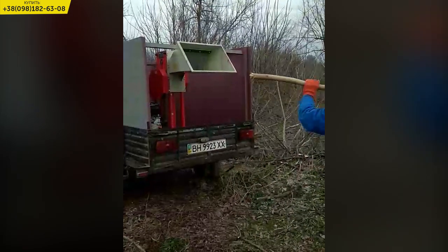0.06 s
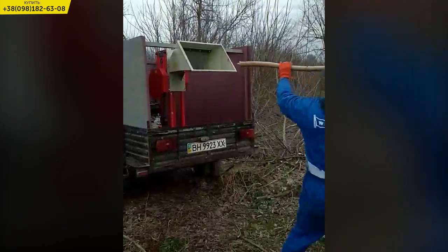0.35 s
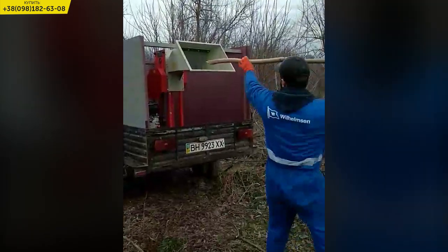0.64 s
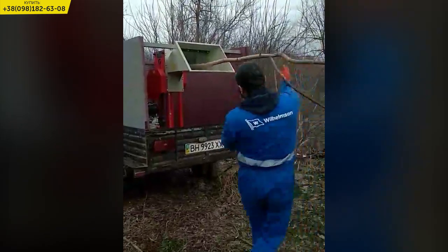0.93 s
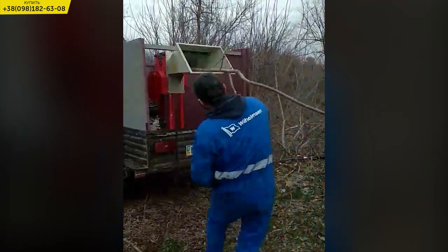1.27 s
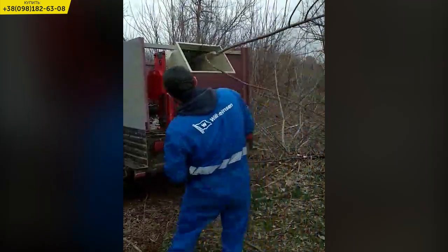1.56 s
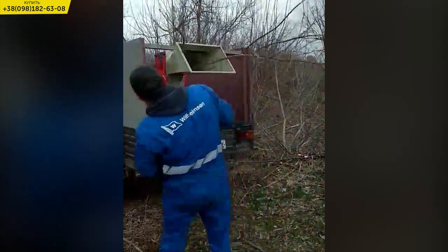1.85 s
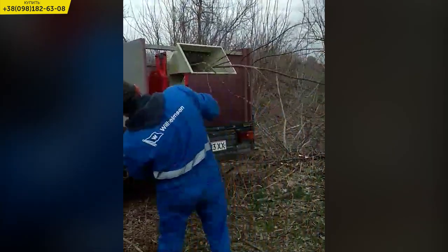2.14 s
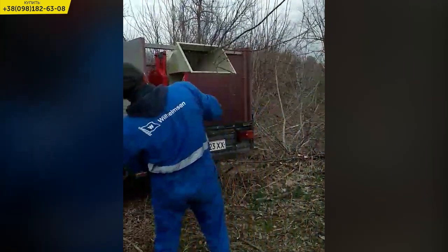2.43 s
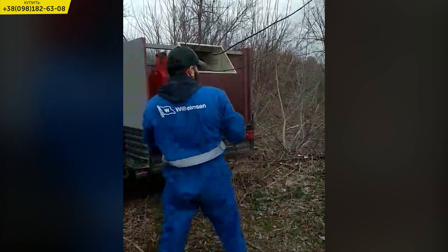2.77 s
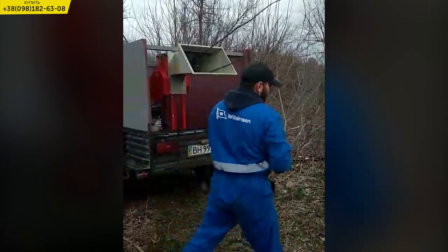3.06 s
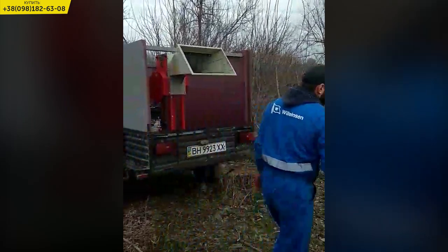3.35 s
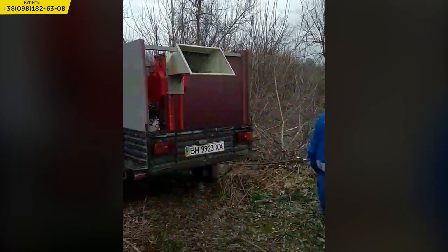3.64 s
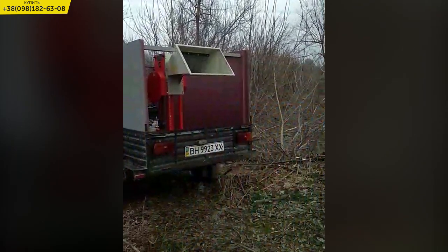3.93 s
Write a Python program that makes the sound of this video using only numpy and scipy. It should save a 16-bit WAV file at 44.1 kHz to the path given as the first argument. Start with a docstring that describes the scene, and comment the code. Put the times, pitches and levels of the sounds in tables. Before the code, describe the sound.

A wood chipper drones loudly outdoors, then rapidly chops up a branch fed into it.

```python
"""An engine-driven wood chipper runs outdoors, a few metres away, its drive squeaking.
After about a second a long branch goes in, and the engine sags as the knives knock rapidly on it.
Chips start to spray out in swishes, about 14 a second; the wood crunches and rasps on the steel.
The knocks ring the steel hopper (the feed funnel), which booms twice on thick wood.
Towards the end the knives bite less hard and the engine picks up speed again."""
import sys
import numpy as np
from scipy import signal
from scipy.fft import rfft, irfft
from scipy.io import wavfile
from scipy.ndimage import uniform_filter1d

SR = 44100
rng = np.random.default_rng(int(sys.argv[2]) if len(sys.argv) > 2 else 0)


def wrap_up_sound(samples):
    """Save the sound to the file named by the first command line argument, as 16-bit audio."""
    columns = np.atleast_2d(samples).T
    # keep every value between -1 and 1, then stretch to whole-number steps
    tamed = np.clip(columns, -1, 1)
    steps = np.round(tamed * 32767).astype(np.int16)
    wavfile.write(sys.argv[1], SR, steps)


N = 176400
T, HZ = np.arange(N) / SR, np.fft.rfftfreq(N, 1 / SR)

# Levels in the tables are relative. A "colour" says how strong a sound is from low to high pitch.
# how hard the knives bite: t/s, level/dB
BITE = [(.8, -49), (1.02, -13.5), (1.17, -20), (1.245, -11), (1.27, -1), (1.32, -1.5), (1.52, 1.5),
        (1.8, 0), (2.07, -1.5), (2.14, 3), (2.22, -1.5), (2.44, 2.5), (2.52, -2.5), (2.57, 2), (2.8, -6),
        (2.92, -3), (3.03, -5), (3.27, -4), (3.4, -1.5), (3.46, -5.5), (3.53, -2), (3.62, -4.5), (4, -7)]
# colour of knives in wood: f/Hz, level/dB
CHOP_COLOUR = [(30, -40.5), (70, 0.5), (110, -2), (200, 4), (300, 2.5), (400, -2), (650, -4.5), (900, -7),
               (1300, -9.5), (1900, -10), (2200, -17.5), (2600, -26.5), (3800, -28.5), (5000, -46.5)]
# pitches at which the steel hopper and housing ring: f/Hz, width/Hz, level/dB
HOUSING_RINGS = [(162.7, 7.7, 3.5), (336.6, 14.4, 7.5), (458, 26, 5), (581.3, 20.6, 8.5), (651, 21.3, 9.5),
                 (764, 6.3, 13), (808, 7.5, 8.5), (1000, 19, 8), (1030.5, 21.7, 10), (1415.5, 24, 11.5),
                 (1487, 14.5, 7), (1987, 60, 2)]
# the hopper's low boom: t/s, level/dB
LOW_BOOM = [(0, -45), (1.25, -32), (1.45, -10), (1.525, 3.5), (1.6, 2), (1.73, -10), (1.8, -4), (1.87, -11),
            (2.19, -6), (2.235, 2.5), (2.35, 1), (2.45, -3.5), (2.75, -19), (3.12, -6), (3.35, -18),
            (3.56, -9), (3.7, -18), (4, -20)]
# its upper boom, which rises as thick wood goes in: t/s, level/dB, f/Hz
HIGH_BOOM = [(1.25, -45, 220), (1.48, -8, 225), (1.53, 3, 235), (1.58, 3.5, 268), (1.74, 2.5, 272),
             (1.81, -3, 238), (1.9, -12, 230), (2.17, -7, 215), (2.26, -1, 240), (2.33, -5, 262),
             (2.45, 3, 235), (2.56, -10, 232), (2.63, 1, 232), (2.76, -12, 235), (3.14, -7, 238),
             (3.5, -22, 235)]
# crunches where the wood splits: t/s, level/dB
CRUNCHES = [(1.258, 0), (1.284, -1), (1.5, -2), (2.125, -6), (2.15, -1), (2.553, 2), (2.58, 0), (3.245, -2),
            (3.32, -1), (3.355, -2)]
# their colour: f/Hz, level/dB
CRUNCH_COLOUR = [(60, -23), (300, -5), (700, -13), (1500, -1), (2000, 0), (2700, -19), (6000, -42)]
# how often the engine fires: t/s, f/Hz
FIRING_RATE = [(0, 56.1), (.3, 56.4), (.8, 56.3), (1.27, 56.7), (1.42, 54.5), (1.6, 52.5), (2.0, 53),
               (2.6, 53.4), (2.85, 54.6), (3.6, 54.6), (3.8, 55.6), (4, 56.4)]
# the deep firing tone: t/s, level/dB
DRONE = [(0, -21.5), (.26, -16.5), (1.28, -17.5), (1.39, -25), (1.52, -37), (1.75, -30), (2.05, -26.5),
         (2.6, -21), (2.8, -19.5), (3.55, -20), (3.72, -17), (4, -16)]
# low steady tones of the engine and turning knife drum: multiple of a quarter firing rate, level/dB
MACHINE_TONES = [(3, -48), (6, -37), (8, -30), (10, -29.5), (11, -31), (12, -31), (16, -30.5), (18, -37.5),
                 (20, -37.5), (22, -37.5), (24, -35.5), (26, -37)]
# buzz and clatter of the running machine: t/s, level/dB
RUNNING = [(0, 4), (.2, 0.5), (.45, 3), (1.05, 1.5), (4, 1)]
# their colour: f/Hz, level/dB
CLATTER_COLOUR = [(20, -27), (45, 4.5), (90, -1), (160, -1.5), (300, -6.5), (450, -9.5), (620, -9.5),
                  (900, -11.5), (1400, -14.5), (2000, -13), (2400, -19.5), (2850, -30.5), (3150, -17.5),
                  (3600, -23), (4450, -21), (5100, -33.5), (16000, -79)]
# the steel's singing note: t/s, level/dB
SINGING = [(0, -2), (.35, -28), (.85, -22), (1.07, 1), (1.28, -7.5), (1.4, 2.5), (1.72, -8.5), (1.92, 7),
           (2.1, -0.5), (2.3, -2), (2.55, -3.5), (2.8, 0.5), (3.1, -2.5), (3.4, -8), (3.52, 5.5),
           (3.7, -14), (4, 2)]
# its low hum: t/s, level/dB
HUM = [(0, 1), (.22, -9.5), (.47, 0), (.9, -10.5), (1.4, -26), (2.3, -4), (2.7, -2.5), (2.95, 7.5),
       (3.15, -6), (3.3, 1), (3.6, -5), (4, -0.5)]
# swishes of chips: t/s, level/dB
SWISHES = [(1.273, 3), (1.338, 2), (1.415, 3), (1.492, 2), (1.565, 0), (1.634, 1), (1.716, 1), (1.785, 2),
           (1.857, 3), (1.926, 2), (1.998, 2), (2.074, 3), (2.14, 2), (2.216, 1), (2.285, 4), (2.357, 3),
           (2.423, 1), (2.496, 5), (2.567, 3), (2.635, 4), (2.706, 4), (2.776, 4), (2.842, 4), (2.914, 2),
           (2.985, 4), (3.052, 3), (3.122, 5), (3.189, 3), (3.255, 4), (3.325, 3), (3.386, 5), (3.467, 3),
           (3.538, 2), (3.607, 2), (3.673, 1), (3.742, 0), (3.811, -3)]
# their colour: f/Hz, level/dB
SWISH_COLOUR = [(20, -50), (3000, -35), (6000, -27), (7000, -13), (7900, -2), (9300, -1), (10800, 0),
                (12500, -1.5), (14000, -6), (15500, -16)]
# colour of the rushing air: f/Hz, level/dB
AIR_COLOUR = [(20, -40), (2500, -32), (4400, -14), (5100, -19), (6000, -14), (6900, -11.5), (7500, -6),
              (9000, -5), (10200, 0), (11300, 0), (12200, -4.5), (13800, -5.5), (15500, -10.5)]
# rasps of the branch on the steel: t/s, length/s, level/dB
RASPS = [(.395, .08, 0), (1.24, .04, 3), (1.315, .04, 2), (1.395, .035, 2), (1.54, .04, 0),
         (1.615, .035, -1), (1.68, .045, 2), (1.76, .04, -1), (1.91, .03, 1), (1.97, .05, -1),
         (2.11, .05, 3), (2.54, .08, 0), (3.025, .04, -2), (3.22, .06, -1), (3.735, .06, 0), (3.87, .04, 3)]
# their colour: f/Hz, level/dB
RASP_COLOUR = [(1500, -25), (2700, -5), (3100, 0), (4100, -1), (5500, -25)]
# squeaks of the drive: t/s, length/s, level/dB
SQUEAKS = [(0, .07, -3), (.1, .18, 0), (.3, .3, -1), (.62, .07, 1), (.75, .2, -3), (1.11, .11, 0),
           (1.215, .06, 2), (1.67, .045, -2), (2.375, .05, -4), (2.535, .045, 3), (2.67, .045, 0),
           (2.87, .09, -7), (3.22, .045, -2), (3.63, .05, 3), (3.7, .045, 1), (3.76, .06, -1),
           (3.94, .08, 0)]
# colour of the wind: f/Hz, level/dB
WIND_COLOUR = [(8, -3), (30, -6), (70, 12), (110, -17), (250, -37), (1000, -55)]
# how alike a noise is at the two microphones: f/Hz, likeness (1 = the same)
LIKENESS = [(60, .95), (150, .97), (300, .95), (640, .94), (1400, .86), (2200, .7), (3100, .45), (6800, .2),
            (15000, .25)]
# how much louder the left microphone is than the right: f/Hz, level/dB
BALANCE = [(60, 0), (170, -.6), (350, 1.3), (700, 1.9), (1400, .2), (2500, .8), (4500, 2.6), (13000, 3.7)]
# how far the left microphone lags behind: f/Hz, phase/rad
LEFT_LAG = [(60, 0), (600, 0.4648), (1460, 0.5), (2150, 1.51), (3300, -1.04), (4650, 2.9), (6900, 7.5),
            (8900, 5), (11800, 7.5), (15300, 8.5)]

CHOP_DB, CHOP_TOP_HZ, UNEVEN_FEED_DB, UNEVEN_FEED_HZ = -17, 6000, 1, 9.5
KNOCK_FADE, KNOCK_FLOOR = 0.22, 0.65  # fade as a share of the time between knocks; steady part
SPLINTER_DB, SPLINTER_HZ = 3, 780  # depth and speed of the splinters' flicker
LOW_BOOM_HZ, LOW_BOOM_DB, HIGH_BOOM_DB = 190.6, -15, -18.5
CRUNCH_DB, CRUNCH_RISE_S, CRUNCH_FADE_S = -24.5, .005, .036
TONE_WAVER_DB, JITTER_CYCLES = 1.5, 0.0015
CLATTER_DB, BUZZ_DB, CLATTER_DEPTH = -25.5, -30.5, 0.19
SINGING_HZ, SINGING_DB, HUM_HZ, HUM_DB, NOTE_WAVER_DB, NOTE_DRIFT_HZ = 727, -28, 335, -27.5, 3.2, 5
SWISH_DB, SWISH_RISE_S, SWISH_FALL_S = -29.7, .0055, .009
AIR_DB, AIR_FLUTTER_DB = -31, 1.15
RASP_DB, RASP_GRAIN_DB = -38.5, 2.5
SQUEAK_HZ, SQUEAK_DB, SQUEAK_LOW_HZ, SQUEAK_LOW_DB, SQUEAK_WIDTH_HZ = 3300, -39, 3077, -10, 65
SQUEAK_IDLE_DB, SQUEAK_FLUTTER_DB, CHATTER_DB, CHATTER_LEAD_S = -12, 2, -9.5, .018
WIND_DB = -39.5
PEAK_LIMIT, TREBLE_EDGE_HZ = .97, 15750


def knives(cycle):
    """The knives knock on the wood twice per engine firing; the steel rings and the hopper booms."""
    since_knock = (4 * cycle) % 1
    knocks = (KNOCK_FLOOR + np.exp(-since_knock / KNOCK_FADE)) * flicker(SPLINTER_DB, SPLINTER_HZ)
    colour = amp(across(CHOP_COLOUR)) * housing() / (1 + (HZ / CHOP_TOP_HZ) ** 4)
    bite = amp(CHOP_DB + curve(BITE)) * flicker(UNEVEN_FEED_DB, UNEVEN_FEED_HZ)
    return bite * noise(knocks, colour) + hopper(knocks)


def hopper(knocks):
    """Thick wood makes the hopper boom at two pitches: the lower stays put, the upper slides."""
    times, db, hz = np.transpose(HIGH_BOOM)
    high = amp(HIGH_BOOM_DB + np.interp(T, times, db)) * boom(knocks, np.interp(T, times, hz), 16.4)
    low = amp(LOW_BOOM_DB + curve(LOW_BOOM)) * boom(knocks, LOW_BOOM_HZ, width_hz=16)
    return low + high


def boom(knocks, hz, width_hz):
    """One deep ring of the hopper, fed by the knocks, moved to the pitch hz and evened out in level."""
    ring = signal.hilbert(noise(knocks, resonance(LOW_BOOM_HZ, width_hz)))
    shift_turns = np.cumsum((hz - LOW_BOOM_HZ) * np.ones(N)) / SR
    ring = (ring * np.exp(2j * np.pi * shift_turns)).real
    power = uniform_filter1d((ring ** 2).mean(0), size=1800)
    return ring / np.sqrt(power + 0.03)


def housing():
    """The steel boosts sound near its own ringing pitches; gives the gain at each frequency."""
    return np.sqrt(1 + sum(amp(db) ** 2 * resonance(hz, width) for hz, width, db in HOUSING_RINGS))


def crunches():
    """Splitting wood lets go sudden bursts of splinters that ring the housing."""
    loudness = np.zeros(N)
    for start, db in CRUNCHES:
        age = np.maximum(T - start, 0)
        loudness += amp(db) * np.minimum(age / CRUNCH_RISE_S, 1) * np.exp(-age / CRUNCH_FADE_S)
    colour = amp(across(CRUNCH_COLOUR)) * np.sqrt(housing())
    return amp(CRUNCH_DB) * loudness * noise(flicker(SPLINTER_DB, SPLINTER_HZ), colour)


def engine(cycle):
    """A deep firing tone, low steady tones of engine and knife drum, the housing's buzz and clatter."""
    def tone(per_firing):
        return np.cos(2 * np.pi * (2 * per_firing * cycle + rng.random()))
    low_tones = sum(amp(db) * flicker(TONE_WAVER_DB, 4.3) * tone(k / 4) for k, db in MACHINE_TONES)
    colour = amp(across(CLATTER_COLOUR)) * housing()
    overtones = sum(tone(k / 4) for k in range(25, 150))
    buzz = amp(BUZZ_DB) * unit(irfft(rfft(overtones) * colour, N))
    clatter = amp(CLATTER_DB) * noise(1 + CLATTER_DEPTH * tone(1), colour)
    drone = amp(curve(DRONE)) * tone(1)
    return drone + low_tones + amp(curve(RUNNING)) * (buzz + clatter)


def steel_panels():
    """The panels vibrate in two wavering notes that swell and fade."""
    def note(hz):
        waver = flicker(NOTE_WAVER_DB, 57)
        turns = np.cumsum(hz + NOTE_DRIFT_HZ * wander(21.9)) / SR
        return np.sqrt(2) * waver * np.sin(2 * np.pi * turns)
    singing = amp(SINGING_DB + curve(SINGING)) * note(SINGING_HZ)
    return singing + amp(HUM_DB + curve(HUM)) * note(HUM_HZ)


def blower():
    """Rushing air hisses all the time, and chips fly out in swishes."""
    flutter = flicker(AIR_FLUTTER_DB, 270)
    hiss = amp(AIR_DB) * noise(flutter, amp(across(AIR_COLOUR)))
    return hiss + amp(SWISH_DB) * swish_loudness() * noise(flutter, amp(across(SWISH_COLOUR)))


def swish_loudness():
    """Each spray of chips swells quickly and falls a little more slowly."""
    power = np.zeros(N)
    for peak_s, db in SWISHES:
        width_s = np.where(T < peak_s, SWISH_RISE_S, SWISH_FALL_S)
        power += amp(db) ** 2 * np.exp(-np.minimum(((T - peak_s) / width_s) ** 2, 50))
    return np.sqrt(power)


def rasps():
    """The branch scrapes the steel in grainy bursts."""
    scrape = noise(flicker(RASP_GRAIN_DB, SPLINTER_HZ), amp(across(RASP_COLOUR)))
    return amp(RASP_DB) * bursts(RASPS, edge_s=.012) * scrape


def drive():
    """The drive squeaks thinly: in long stretches at first, then chattering just before each swish."""
    chatter = amp(CHATTER_DB) * np.interp(T + CHATTER_LEAD_S, T, swish_loudness())
    loudness = amp(SQUEAK_IDLE_DB) + chatter + bursts(SQUEAKS, edge_s=.018)
    flutter = flicker(SQUEAK_FLUTTER_DB, 25)
    high = resonance(SQUEAK_HZ, SQUEAK_WIDTH_HZ)
    low = amp(SQUEAK_LOW_DB) * resonance(SQUEAK_LOW_HZ, SQUEAK_WIDTH_HZ)
    return amp(SQUEAK_DB) * loudness * flutter * noise(1, high + low)


def wind():
    """Faint wind rumbles on each microphone separately."""
    spectrum = rfft(rng.standard_normal((2, N))) * amp(across(WIND_COLOUR))
    return amp(WIND_DB) * unit(irfft(spectrum, N))


def noise(loudness, colour):
    """Left and right noise, partly alike, shaped in time, then coloured and scaled to strength 1."""
    left, other = rfft(rng.standard_normal((2, N)) * loudness)
    like = np.clip(across(LIKENESS), 0, 1)
    right = like * left + np.sqrt(1 - like ** 2) * other
    # this phase makes the ringing follow each knock, never come before it
    log_gain = np.log(np.r_[colour, colour[-2:0:-1]] + 1e-6)
    phase = -signal.hilbert(log_gain).imag[:len(HZ)]
    return unit(irfft(np.array([left, right]) * colour * np.exp(1j * phase), N))


def bursts(rows, edge_s):
    """Loudness of bursts that swell, hold and stop."""
    return sum(amp(db) * np.clip(np.minimum(T - start, start + length - T) / edge_s, 0, 1)
               for start, length, db in rows)


def resonance(hz, width_hz):
    """A hump around one ringing pitch."""
    return 1 / (1 + (2 * (HZ - hz) / width_hz) ** 2)


def wander(rate_hz):
    """A smooth random wobble, up to about the given rate."""
    return unit(irfft(rfft(rng.standard_normal(N)) * np.exp(-(HZ / rate_hz) ** 2), N))


def flicker(depth_db, rate_hz):
    """A gain that wobbles at random around 1."""
    return amp(depth_db * wander(rate_hz))


def curve(points):
    """Joins (time, value) points over the whole scene."""
    return np.interp(T, *np.transpose(points))


def across(points):
    """Joins (frequency, value) points along a scale of octaves."""
    hz, value = np.transpose(points)
    return np.interp(np.log(HZ + 1), np.log(hz), value)


def amp(db):
    """Turns decibels into a gain."""
    return 10 ** (np.asarray(db) / 20)


def unit(x):
    """Scales a signal to an average strength (rms) of 1."""
    return x / np.sqrt(np.mean(x ** 2) + 1e-20)


def scene():
    """The whole chipper in a faint wind; engine and knives keep in step."""
    # counts the engine's uneven cycles, each two firings long
    cycle = np.cumsum(curve(FIRING_RATE) / 2) / SR + JITTER_CYCLES * wander(18)
    return (engine(cycle) + knives(cycle) + crunches() + rasps()
            + steel_panels() + blower() + drive() + wind())


def record(dry):
    """Two close microphones, the left mostly later and louder; peaks are rounded, the top treble cut."""
    side = amp(across(BALANCE) / 2)
    microphones = np.array([side * np.exp(-1j * across(LEFT_LAG)), 1 / side])
    heard = irfft(rfft(dry) * microphones, N)
    rounded = heard / (1 + (heard / PEAK_LIMIT) ** 8) ** (1 / 8)
    treble_cut = signal.firwin(701, TREBLE_EDGE_HZ, window=("kaiser", 9), fs=SR)
    return signal.oaconvolve(rounded, treble_cut[None], "same")


dry = scene()
out = record(dry)
wrap_up_sound(out)
```